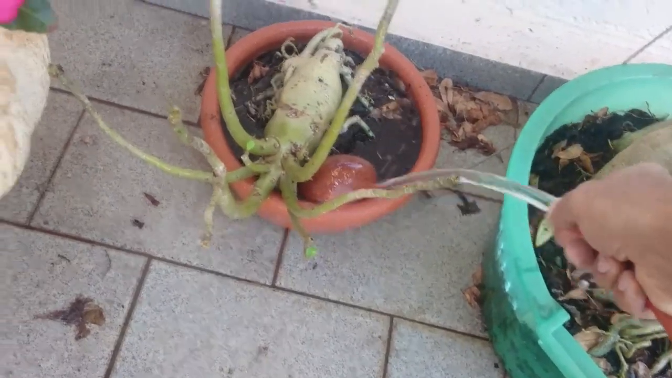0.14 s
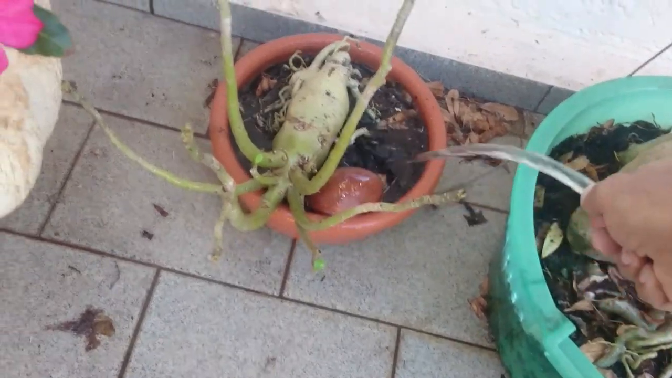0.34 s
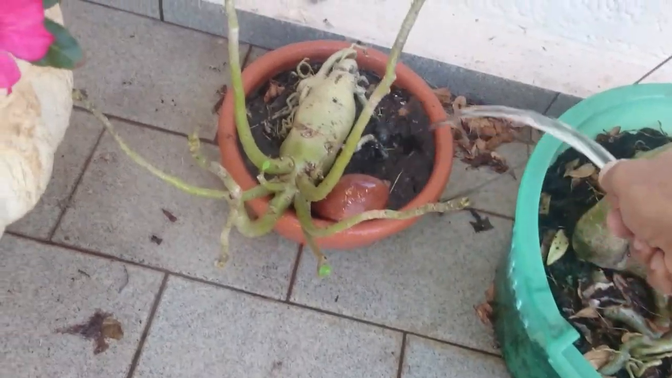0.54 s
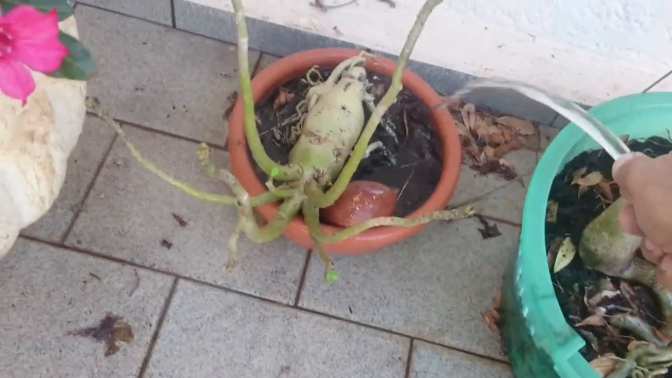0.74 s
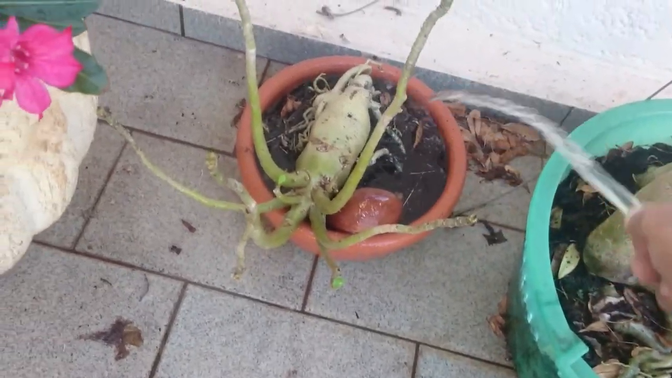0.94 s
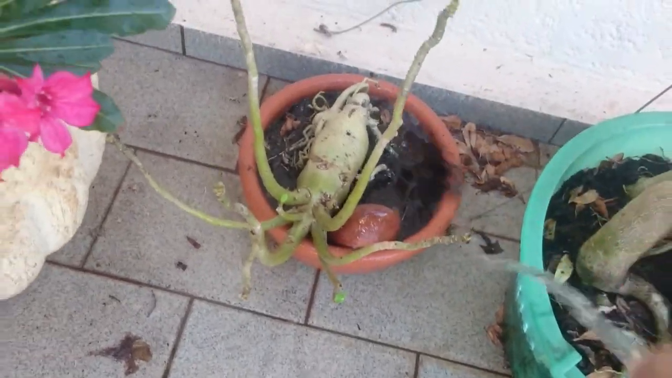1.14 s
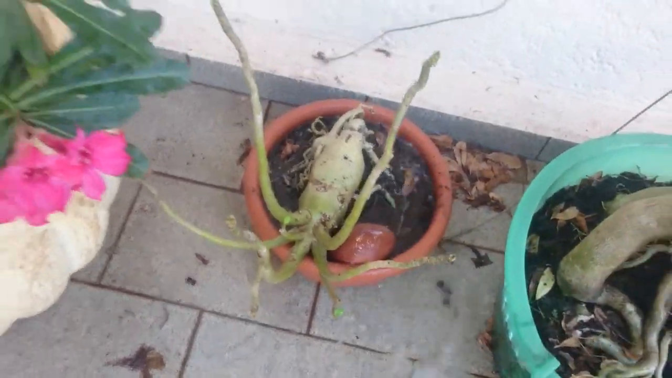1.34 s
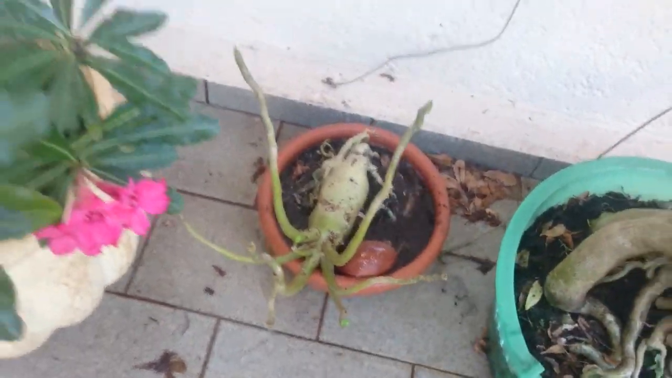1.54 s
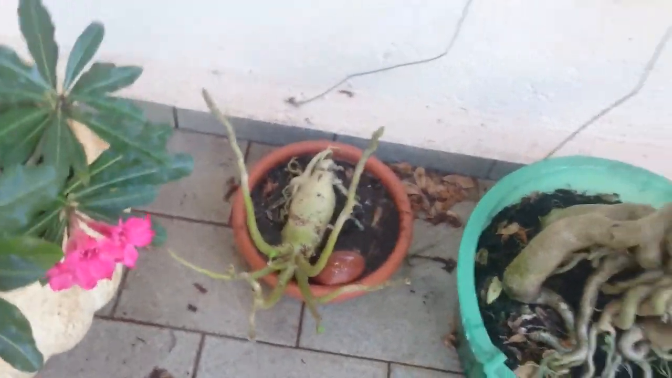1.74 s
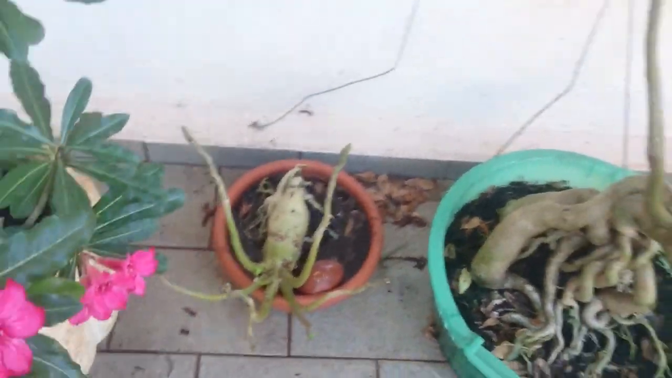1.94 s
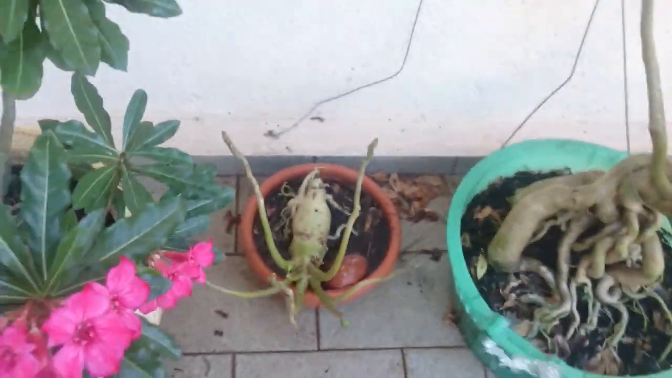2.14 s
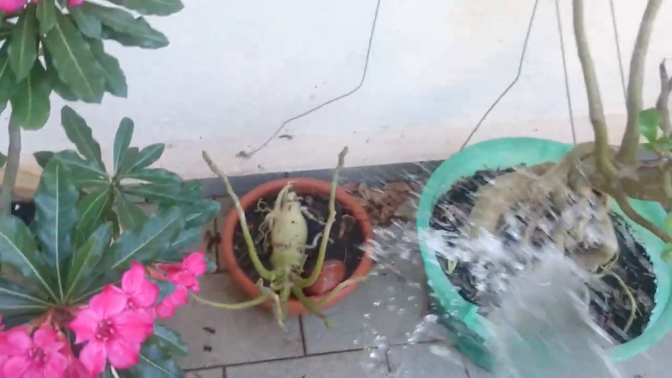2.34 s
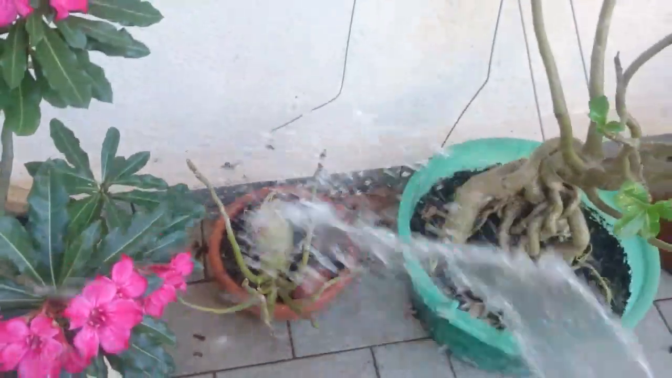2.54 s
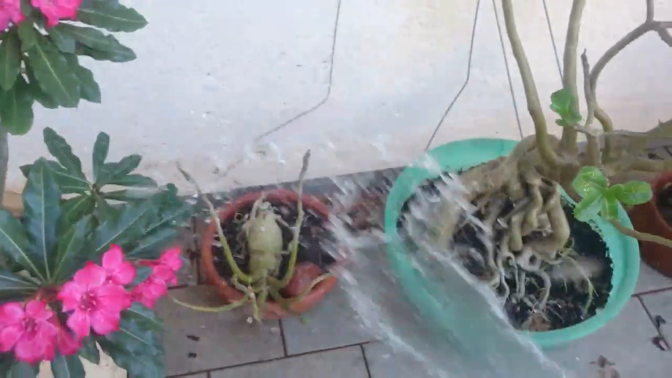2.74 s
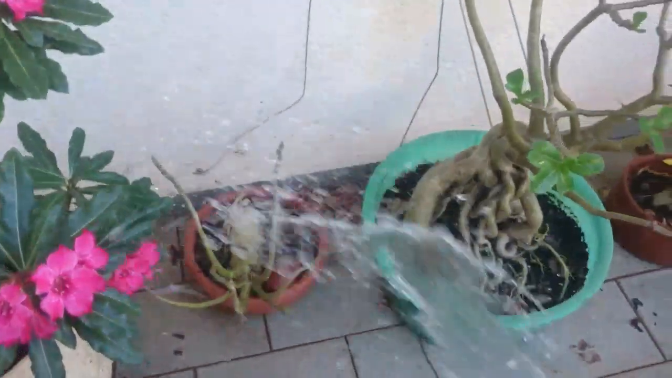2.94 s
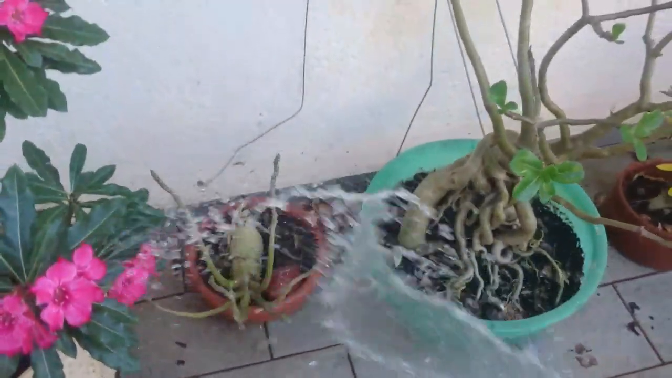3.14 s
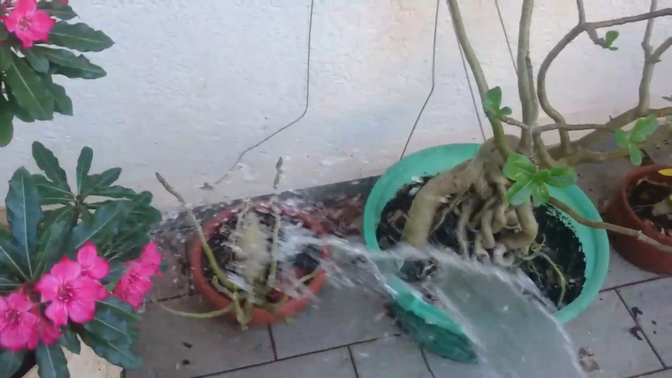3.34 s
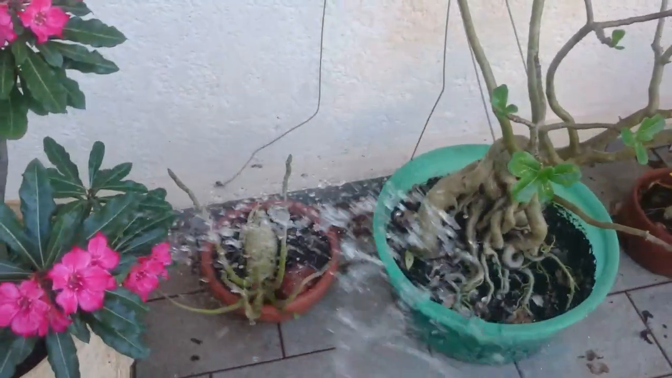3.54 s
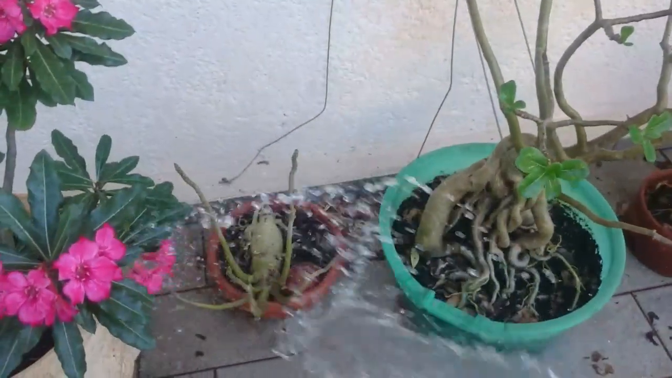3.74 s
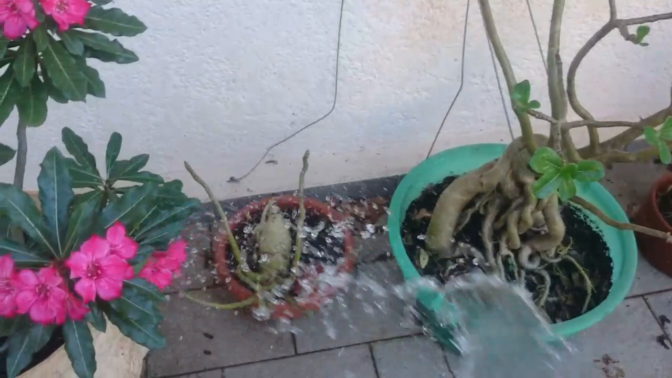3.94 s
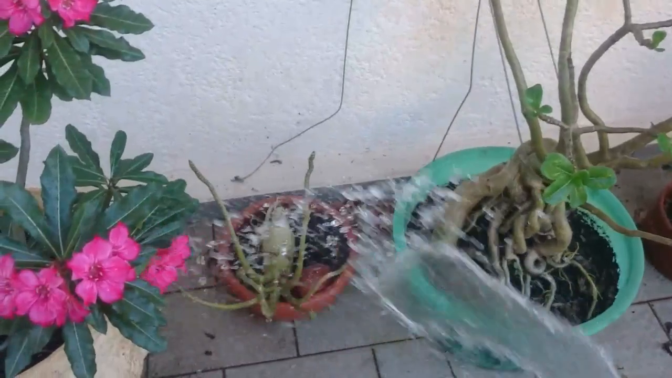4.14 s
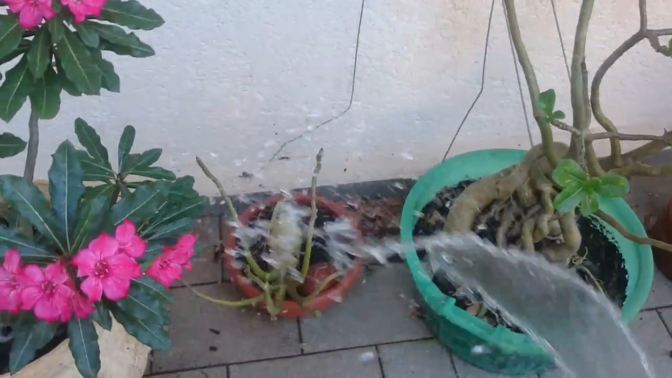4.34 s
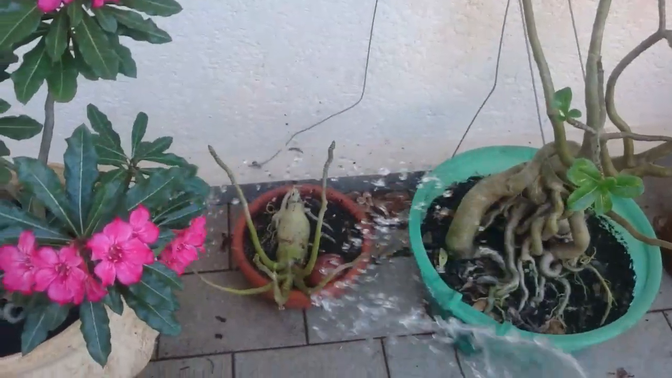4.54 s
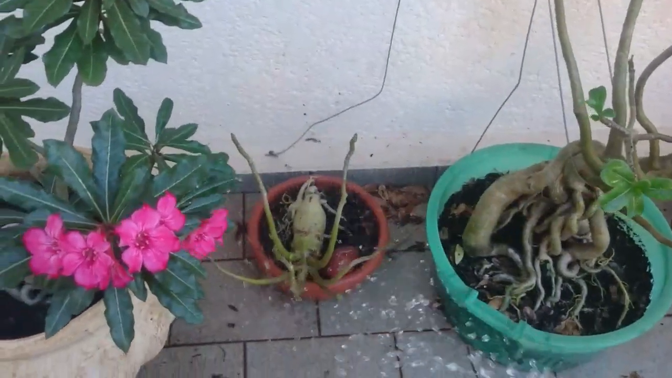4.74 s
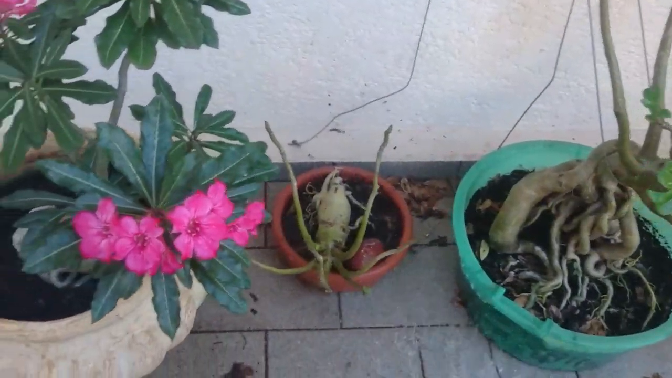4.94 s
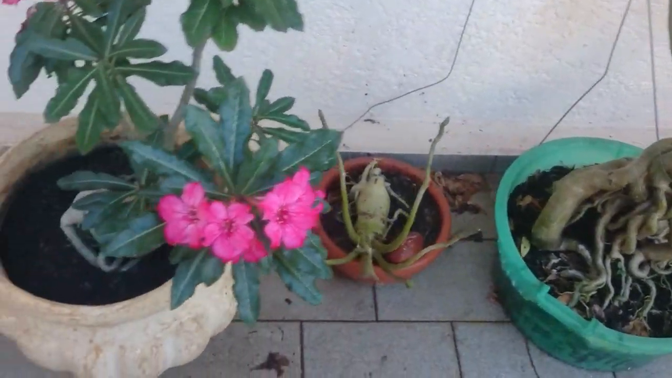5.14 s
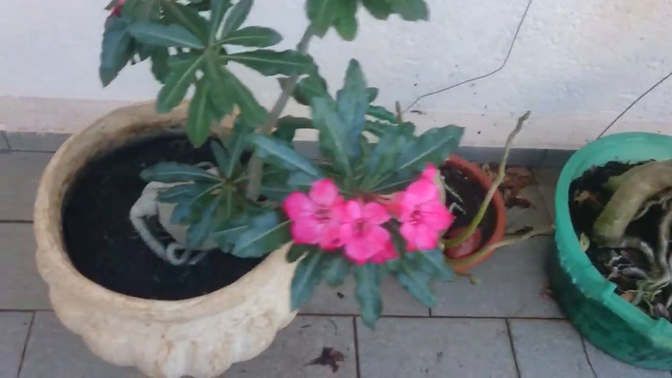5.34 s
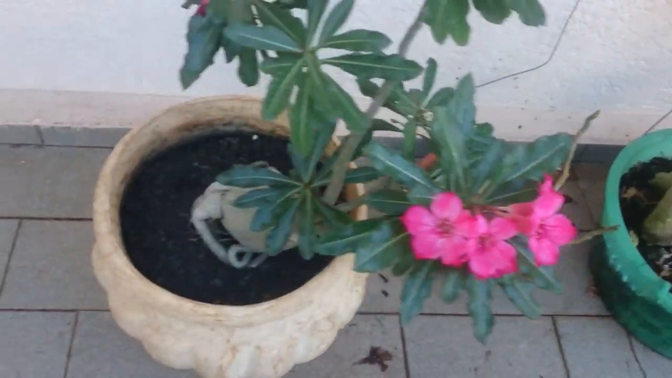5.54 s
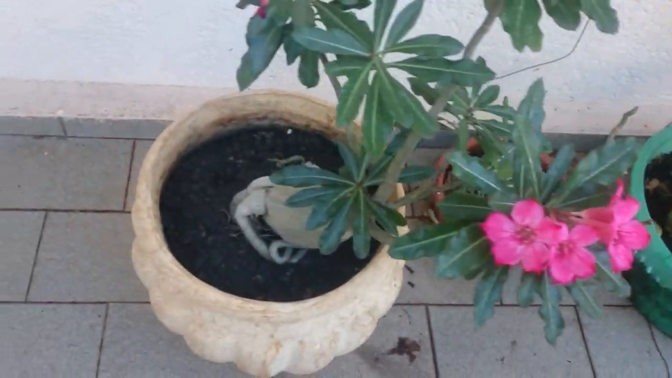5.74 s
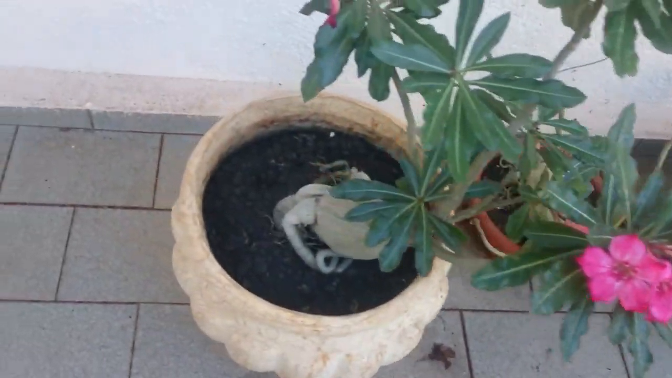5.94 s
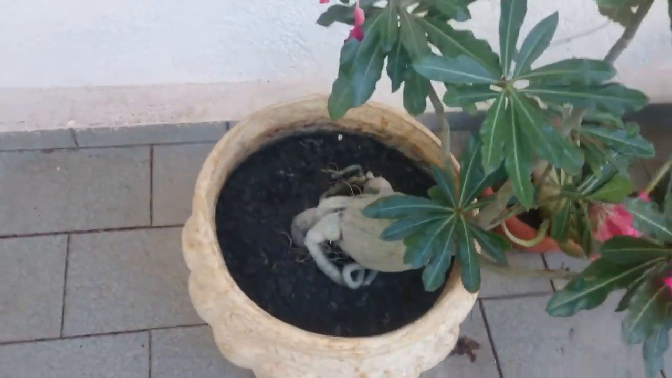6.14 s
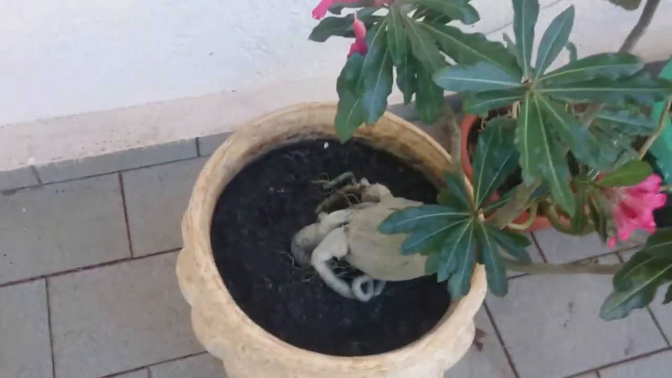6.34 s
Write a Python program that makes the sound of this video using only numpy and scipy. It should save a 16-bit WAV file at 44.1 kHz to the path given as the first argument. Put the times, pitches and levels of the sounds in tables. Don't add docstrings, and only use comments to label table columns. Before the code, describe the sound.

Water from a garden hose, heard near in stereo: quiet, steady pouring with small rising gurgles, a few sharp spatters, then dense irregular splashing with wet slaps and clicking droplets, leaning slightly left. It eases abruptly into a faint misty trickle with tiny ticks. Short hard reflections come from wall and tiles, a shoe scuffs dully once or twice, and low far traffic lies underneath.

```python
import sys
import numpy as np
from scipy import signal
from scipy.fft import rfft, irfft, next_fast_len
from scipy.io import wavfile
from scipy.ndimage import uniform_filter1d

SR = 44100
rng = np.random.default_rng(int(sys.argv[2]) if len(sys.argv) > 2 else 0)


def gain_from_decibels(decibels):
    exponent = np.asarray(decibels, float) / 20
    return 10 ** exponent


def wav_record(signal):
    frames = np.transpose(np.atleast_2d(signal))
    bounded = np.clip(frames, -1, 1)
    quanta = np.round(bounded * 32767).astype(np.int16)
    wavfile.write(sys.argv[1], SR, quanta)


N = 286650
TIME = np.arange(N) / SR


def evened(x):
    return x / np.sqrt(np.mean(x ** 2) + 1e-20)


def read(points, hz):
    f, value = np.transpose(points)
    return np.interp(np.log(hz + 1), np.log(f + 1), value)


def coloured(x, gain):
    size = next_fast_len(N + 4096)
    spectrum = rfft(x, size) * gain(np.fft.rfftfreq(size, 1 / SR))
    return irfft(spectrum, size)[..., :N]


def add(mix, start_s, sound):
    part = mix[..., max(round(start_s * SR), 0):][..., :sound.shape[-1]]
    part += sound[..., :part.shape[-1]]


# start_s, flow_db, thumb_fan_0_to_1, left_minus_right_db
HOSE_FLOW = [
    (0.0, -43, 0, 1.5),
    (1.18, -41.5, 0.35, 2),
    (1.751, -44.5, 0, 0),
    (2.41, -39.5, 0.4, 3),
    (2.7, -40, 0.6, 1),
    (4.56, -42.5, 0.85, 2),
    (4.82, -37.5, 0.94, 2.5),
    (5.25, -44, 0.42, 1.5),
    (5.96, -47.5, 0.8, 0.5),
    (6.5, -46, 0.24, 0.5),
]
# start_s, level_db, mist_share_db, length_s
SLUG_SLAPS = [(0.16, -33, -14, 0.083), (0.22, -39, 1, 0.044), (1.262, -34, 0, 0.02),
              (1.929, -32.5, 1.5, 0.04), (2.031, -35.5, 2, 0.075), (2.062, -33, -14.5, 0.077),
              (2.279, -33, 7, 0.04), (2.34, -41, 7, 0.032), (2.597, -33.5, 1, 0.03),
              (2.669, -34, -5, 0.024), (2.79, -30, -3, 0.022), (2.806, -26, -3.5, 0.032),
              (2.893, -37, 0, 0.29), (3.062, -32.5, 0, 0.049), (3.168, -25.5, -1, 0.031),
              (3.357, -36.5, 5, 0.038), (3.42, -22.5, -10, 0.048), (3.463, -28.5, -11, 0.057),
              (3.55, -33, -3, 0.04), (3.572, -27, -0.5, 0.043), (3.691, -28, -6.5, 0.029),
              (3.828, -27.5, -2.5, 0.039), (4.192, -32, -2, 0.044), (4.206, -31.5, -7, 0.029),
              (4.8, -33, -12, 0.027), (5.247, -40, 3.5, 0.05), (5.726, -40.5, 1.5, 0.025),
              (6.023, -41.5, -4, 0.054), (6.235, -42, 1, 0.06)]
# start_s, level_db, mist_share_db, length_s
LEAF_SHEETS = [(0.896, -31.5, -9, 0.065), (1.055, -32.5, -11, 0.09), (1.226, -23.5, -6.5, 0.021),
               (1.337, -28.5, -4.5, 0.014), (1.53, -35.5, -20, 0.033), (1.748, -36.5, -17, 0.04),
               (1.841, -35, -11, 0.058), (2.105, -32.5, -5, 0.1), (2.243, -29, -5.5, 0.11),
               (2.4, -31, 3.5, 0.05), (2.463, -28.5, -2, 0.031), (2.505, -30.5, -2, 0.055),
               (2.765, -30, -22, 0.038), (3.03, -30, -7, 0.04), (3.126, -33.5, -3, 0.12),
               (3.452, -34, 4, 0.035), (3.93, -30, -19, 0.023), (3.982, -33, -0.5, 0.057),
               (4.087, -32, 0.5, 0.046), (4.352, -35, 1, 0.093), (4.437, -34, -6, 0.039),
               (4.523, -29, -9, 0.07), (4.686, -28.5, -3, 0.054), (4.768, -36.5, 6, 0.032),
               (4.846, -33, 3.5, 0.06), (4.905, -28, -5.5, 0.11), (4.989, -29.5, -1, 0.051),
               (5.61, -40, 0.5, 0.066), (6.318, -39, -16, 0.02)]
# start_s, level_db, mist_share_db
RIM_DRIBBLES = [(0.574, -43, -12), (0.76, -41, 0), (1.45, -42, 0), (1.785, -44, 8), (2.553, -33.5, -4),
                (3.3, -33.5, -4), (4.239, -28.5, -4.5), (4.299, -34, -22), (5.05, -42, -2),
                (5.161, -38, 1.5), (5.366, -42, 0), (5.436, -41, -17), (5.9, -48, 6), (6.42, -51, 1),
                (6.08, -48.5, 6.5), (6.115, -51, 6), (6.35, -49, 8), (3.665, -36, 0), (3.85, -38, -5)]


def water_power():
    start_s, flow_db, fan, _ = np.transpose(HOSE_FLOW)
    large_db, mist_db = np.interp(fan, (0, 1), (-8.5, -10.5)), np.interp(fan, (0, 1), (-5, 0.7))
    shares_db = (large_db, -1.5, mist_db)
    steady = gain_from_decibels([np.interp(TIME, start_s, flow_db + share) for share in shares_db]) ** 2

    bursts, t = np.zeros((3, N)), np.arange(9000) / SR
    dribble_s = 0.044
    thin = LEAF_SHEETS + [(*row, dribble_s) for row in RIM_DRIBBLES]
    for rows, large_share_db in ((SLUG_SLAPS, -7), (thin, -13.5)):
        for s, level_db, mist_share_db, length_s in rows:
            attack = 1 - np.exp(-t / 0.00068)
            body = np.exp(-(t / (0.85 * length_s)) ** 2)
            click, tail = 0.51 * np.exp(-t / 0.0012), 0.023 * np.exp(-t / 0.049)
            size_db = level_db - 5.0 + np.array([[large_share_db], [0], [mist_share_db]])
            add(bursts, s - 0.001, gain_from_decibels(size_db) ** 2 * attack * (body + click + tail))

    landings = (rng.random(N) < 220 / SR) * rng.exponential(1, N)
    clumps = signal.lfilter([1], [1, -np.exp(-1 / (0.003 * SR))], landings)
    ragged = 1.9 + evened(clumps) ** 1.3
    slow = uniform_filter1d(rng.standard_normal((3, N)), size=900)
    surges_db = evened(uniform_filter1d(slow, size=900))
    uneven = gain_from_decibels(surges_db + 0.3 * surges_db[1]) ** 2 * np.sqrt(ragged)
    return steady * uneven / uneven.mean() + bursts * ragged / ragged.mean()


def plink(hz, cycles, glide, lag, phase, rise=0.36):
    u = np.maximum(np.arange(600) - lag, 0) / SR * hz / cycles
    swell = (u / rise) ** 2 * np.exp(2 - 2 * u / rise)
    return swell * np.sin(2 * np.pi * (cycles * u * (1 + glide * u) + phase))


# freq_hz, level_db_per_hz
SPLASH_COLOUR = [(410, -50), (700, -42), (1200, 3), (1710, -16.5), (2100, -15), (2560, -15), (3640, -2),
                 (4670, 0.5), (5840, -1), (7200, -9), (8210, -12.5), (9480, -6), (10400, -10.5),
                 (12300, -14), (16000, -29)]


def patter(low_hz, high_hz, per_s, cycles, hiss, spread_db=3.0, count=24):
    loudness = gain_from_decibels(spread_db * np.minimum(rng.exponential(1, N), 2.5))
    hits = loudness * (rng.random(N) < per_s / SR)
    kind, drops = rng.integers(0, count, N), np.zeros((2, N))
    for k, hz in enumerate(np.geomspace(low_hz, high_hz, count)):
        glide, lag, phase, long = rng.random(4)
        pair = np.array([side * plink(hz, cycles * (0.5 + long), 0.19 * glide, late, phase)
                         for side, late in ((1.0, 0.014), (-0.36, 60 * lag))])
        rain = signal.oaconvolve((hits * (kind == k))[None], pair, axes=1)[:, :N]
        drops += hz / low_hz * rain / np.sqrt(0.5 + long)
    noise = rng.standard_normal((2, N)) * np.sqrt(SR / 2 / (high_hz - low_hz))
    mixed = np.sqrt(1 - hiss) * evened(drops) + np.sqrt(hiss) * noise

    def band(hz):
        edges = (1 + (low_hz / (hz + 1)) ** 16) * (1 + (hz / high_hz) ** 16)
        return gain_from_decibels(read(SPLASH_COLOUR, hz)) / np.sqrt(edges)

    return evened(coloured(mixed, band))


def clumped(x):
    z = signal.stft(x, nperseg=256)[2]
    rough = uniform_filter1d(rng.standard_normal(z.shape[1:]), size=4, axis=0)
    patches = evened(uniform_filter1d(rough, size=12, axis=1))
    depth_db = np.linspace(1.7, 0.35, len(patches))[:, None]
    lift = gain_from_decibels(depth_db * patches)
    lift /= np.sqrt(np.mean(lift ** 2, axis=1, keepdims=True))
    return signal.istft(z * lift, nperseg=256)[1][:, :N]


# low_hz, high_hz, drops_per_s, ring_cycles, hiss_share
DROP_SIZES = [
    (1802, 3080, 900, 11.6, 0.64),
    (3090, 6570, 2500, 8.5, 0.59),
    (6960, 15700, 4700, 9, 0.51),
]


def spray():
    start_s, *_, pan_db = np.transpose(HOSE_FLOW)
    pan = gain_from_decibels(np.interp(TIME, start_s, pan_db - 0.6) * [[0.5], [-0.5]])
    rain = sum(np.sqrt(power) * patter(*size) for power, size in zip(water_power(), DROP_SIZES))
    return pan * clumped(rain)


# start_s, peak_db, pitch_hz, left_minus_right_db
BIG_DROPS = [(0.2086, -19, 2460, 6), (1.3412, -20.5, 4100, 9), (2.062, -22.5, 5260, 17),
             (2.28, -16, 4970, 17), (2.2915, -16.5, 5560, 18), (2.303, -17, 4700, 11),
             (2.341, -21, 4300, 14), (2.4012, -15.5, 4870, 13), (2.4598, -21, 4600, 14),
             (2.4729, -14.5, 4500, 11), (2.6019, -21, 5060, 11), (2.7568, -18.5, 4440, 9),
             (2.807, -13.5, 4100, -1), (2.8216, -22, 4000, -7), (3.0647, -20.5, 3600, -3),
             (3.1722, -25, 4600, -8), (3.4204, -14.5, 3800, -2), (3.4278, -20, 3480, 5),
             (3.433, -17, 3950, 7), (3.4834, -14.5, 3650, 0), (3.8288, -19, 2220, 5),
             (3.9314, -20.5, 5050, 3), (4.5218, -15, 4600, -1), (4.6896, -21, 3500, 16),
             (4.8067, -17, 3540, 6), (4.8483, -21.5, 4700, 17), (4.9067, -17, 4900, 19),
             (4.986, -19, 5070, 17), (5.0092, -18, 4250, 11)]
# start_s, peak_db, pitch_hz
HOSE_DRIPS = [(0.05, -32, 5100), (0.23, -27.0, 3600), (0.45, -36, 3960), (0.5844, -22, 4730),
              (0.54, -32, 3200), (0.754, -30, 3220), (1.227, -22, 5600), (1.253, -22, 4760),
              (1.2, -21, 5380), (1.5383, -26.5, 4260), (2.255, -24, 4960), (2.3654, -23, 5100),
              (2.2, -26, 5460), (3.0745, -20, 3800), (3.1264, -22, 4770), (3.4203, -25, 2040),
              (3.456, -20, 4000), (3.4626, -16.5, 4860), (3.587, -19, 5100), (3.7, -19, 4800),
              (4.6885, -26, 4600), (2.6, -20, 5900), (0.19, -21, 3900), (3.8295, -26, 2900),
              (3.2, -19.5, 3300), (4.2098, -21.5, 2870), (4.24, -19.5, 5300), (4.816, -17.5, 4400),
              (4.916, -25, 4100), (4.9335, -17, 5300), (4.949, -18, 4600), (5.4384, -28.5, 5900),
              (5.8, -31, 3850), (6.028, -32, 5600), (5.6, -34, 5700), (5.945, -35, 5300),
              (5.565, -29.5, 5000), (0.57, -27, 4050), (4.699, -28, 3100), (3.47, -27, 5000),
              (3.1, -16, 5700), (2, -19.5, 7200), (1.339, -20, 6400), (2.4167, -22.5, 3660)]
# start_s, peak_db
PORT_PINGS = [(1.938, -24), (1.941, -25), (2.026, -23), (2.383, -23), (2.4166, -30), (2.426, -21),
              (2.4528, -24), (2.8945, -25), (3.1758, -24), (3.1804, -21), (3.3487, -21.5), (3.37, -30),
              (4.27, -27), (4.433, -23), (4.769, -19.5), (4.885, -21), (5.531, -27.5)]
# start_s, peak_db, pitch_hz, left_minus_right_db
SLUG_SPATTER = [(0.059, -32, 5070, -12), (0.321, -27, 4470, 8), (0.7802, -30, 3880, 11),
                (0.8966, -38, 4240, -6), (0.906, -33, 4460, -7), (0.923, -32, 4540, -5),
                (1.2081, -36, 4570, -13), (1.2661, -23, 4600, 14), (1.642, -31.5, 5570, 17),
                (2.0265, -31, 5990, 12), (2.1068, -29, 5320, 11), (2.1483, -26, 5170, 14),
                (2.5251, -33, 5140, 5), (2.5563, -24.5, 5190, 12), (2.5867, -25, 3960, 10),
                (2.772, -26, 4270, 0), (2.7967, -25, 5960, 5), (2.9455, -29, 4390, 6),
                (2.9797, -25.5, 5620, -3), (2.9928, -31, 5790, -2), (3.175, -19, 4370, -1),
                (3.1783, -24, 4670, 2), (3.3643, -25, 6270, 7), (3.5556, -25, 4780, 2),
                (3.611, -26, 4740, -1), (3.823, -33, 5380, 17), (3.83, -24, 3550, 6),
                (3.9991, -25, 4500, 14), (4.1318, -27, 4800, 7), (4.2127, -26, 5700, 11),
                (4.2566, -27, 5230, 14), (4.3159, -29, 4310, 1), (4.73, -27, 5170, 9),
                (4.782, -30, 4800, 2), (4.8813, -22.5, 5120, 11), (4.911, -24, 5230, 8),
                (4.918, -23, 4800, 9), (4.967, -26, 4340, 8), (5.006, -21, 4860, 14),
                (5.0164, -27, 4050, -3), (5.1486, -35, 5500, 9), (5.185, -31, 3850, 5),
                (5.2668, -30, 5150, 8), (5.7354, -34, 6420, 11), (6.3282, -30.5, 5100, -2)]
# start_s, peak_db, pitch_hz
FINE_SPARKS = [(1.0048, -32, 9150), (2.039, -31, 9600), (2.1276, -32, 9970), (2.162, -35, 9560),
               (2.2799, -22, 9630), (2.3128, -25, 9350), (2.342, -30, 9170), (2.4604, -31, 9040),
               (2.5883, -24, 11000), (2.5979, -23, 9860), (2.695, -33, 9370), (2.979, -36, 8050),
               (3.093, -31, 9300), (3.1266, -30, 10700), (3.3663, -30, 9300), (3.4323, -28, 9300),
               (3.4722, -29, 9000), (3.4808, -33, 9520), (3.7044, -29, 9650), (3.8199, -31, 9390),
               (4.0868, -29, 9700), (4.2059, -31, 8800), (4.2779, -29.5, 9260), (4.3647, -33, 9520),
               (4.5163, -34, 9800), (4.6957, -31, 9730), (4.7877, -28, 8980), (4.8003, -29, 9560),
               (4.8484, -30, 9670), (4.9357, -28, 9500), (4.949, -28, 9800), (5.008, -25, 9350),
               (5.5167, -35, 9930),
               (5.7299, -39, 9710), (5.902, -40, 9700), (6.0193, -40, 9240), (6.2386, -39, 9350),
               (6.269, -34.5, 9330), (6.4278, -39, 9120)]
# start_s, peak_db, pitch_hz
SOIL_BUBBLES = [(0.0999, -43, 1990), (0.1547, -45, 1170), (0.1767, -30.5, 2700), (0.1988, -31, 2500),
                (0.22, -30, 2460), (0.2239, -38, 2610), (0.2829, -36, 2600), (0.2877, -39, 2540),
                (0.3726, -44, 2450), (0.4697, -42, 1960), (0.5604, -41, 2540), (0.7578, -38, 2580),
                (0.7684, -39, 2100), (0.789, -42, 2270), (0.8226, -38, 2450), (0.8535, -38, 2390),
                (1.0313, -38, 2450), (1.0994, -36, 2240), (1.1169, -44, 2060), (1.1316, -36, 2060),
                (1.1541, -37, 2530)]
# start_s, peak_db, pitch_hz
PUDDLE_PLOPS = [(1.2801, -43, 2670), (2.0516, -41, 2280), (2.0759, -41, 2020), (2.2793, -39, 2730),
                (2.3147, -36, 2270), (2.3409, -35.5, 2350), (2.4699, -40, 2990), (2.6736, -44, 1840),
                (2.7722, -39, 2990), (2.8071, -33, 2990), (2.8234, -30, 2860), (2.9444, -36.5, 2950),
                (3.0644, -34, 2990), (3.1693, -30, 2900), (3.3609, -43, 2990), (3.4542, -36, 2320),
                (3.6917, -36, 2090), (4.1005, -41, 2950), (4.2262, -33, 3050), (4.2582, -41, 2630),
                (4.2998, -34, 2890), (4.6962, -33, 2890), (4.8843, -41, 2410), (4.9071, -34, 2860),
                (4.9521, -34, 2930)]


def all_drops():
    start_s, *_, pan_db = np.transpose(HOSE_FLOW)
    ping_hz, ping_pan_db = 9230, 12.5
    swing = 4.5
    rows = BIG_DROPS + [(s, db, hz, swing * np.interp(s, start_s, pan_db)) for s, db, hz in HOSE_DRIPS]
    rows += [(s, db, ping_hz, ping_pan_db) for s, db in PORT_PINGS]
    rows += [(s, db + 1, hz, side_db) for s, db, hz, side_db in SLUG_SPATTER]
    rows += [(s, db + 3.5, hz, ping_pan_db) for s, db, hz in FINE_SPARKS]
    rows += [(s, db + 6, hz, 1.5) for s, db, hz in SOIL_BUBBLES + PUDDLE_PLOPS]
    return rows


def big_drops():
    rings, spits, t = np.zeros((2, N)), np.zeros((2, N)), np.arange(600) / SR
    spit_shape = 0.9 * np.exp(-t / 0.0011) + 0.5 * np.exp(-(t / 0.0027) ** 2) + 0.31 * np.exp(-t / 0.0044)
    spit_hz = 3500.0
    for (s, peak_db, hz, pan_db), (lag, phase) in zip(all_drops(), rng.random((400, 2))):
        level = gain_from_decibels(peak_db + pan_db * np.array([[0.5], [-0.5]]))
        cycles = 3.14 + hz / 1390.0
        late = (np.round((8 + 40 * lag) * hz / SR) + 1 / 3) * SR / hz
        left = plink(hz, cycles, 0.018, 0, phase, 0.37)
        right = -plink(hz, cycles, 0.0035, late, phase, 0.4)
        add(rings, s - 0.25 * cycles / hz - 0.0003, level * np.array([left, right]))
        spit = rng.standard_normal((2, 600)) * spit_shape
        add(spits, s - 0.0008, level * min(hz / spit_hz, 1) ** 2 * spit)
    spits = coloured(spits, lambda hz: gain_from_decibels(read(SPLASH_COLOUR, hz)) / (1 + (2500.0 / (hz + 1)) ** 8))
    return gain_from_decibels(-0.5) * rings + gain_from_decibels(-6.5) * spits


def resonate(x, hz, width_hz):
    turn = np.exp(2j * np.pi * np.cumsum(hz) / SR)
    r = np.exp(-np.pi * width_hz / SR)
    return (turn * signal.lfilter([1 - r], [1, -r], x / turn)).real


# start_s, length_s, from_hz, to_hz, level_db
DEEP_POCKETS = [(0.15, 0.04, 1150, 1400, -46), (0.187, 0.044, 2350, 2630, -42),
                (0.245, 0.086, 2590, 3200, -44), (0.432, 0.058, 2020, 1940, -52),
                (0.633, 0.06, 1900, 1970, -45), (0.742, 0.15, 2520, 2500, -42),
                (0.758, 0.065, 2060, 1950, -42), (0.84, 0.041, 1950, 1930, -48),
                (1.01, 0.09, 2450, 2500, -39.5), (1.074, 0.041, 1930, 2050, -41),
                (1.09, 0.048, 1300, 1500, -46), (1.125, 0.034, 1850, 2100, -41),
                (1.128, 0.033, 2300, 2590, -39)]
# start_s, length_s, from_hz, to_hz, level_db
SHALLOW_POCKETS = [
    (.25, 0.15, 3660, 4700, -39.5),
    (.45, 0.2, 4100, 4680, -37.5),
    (.69, 0.14, 3940, 3940, -40),
    (.83, 0.11, 3960, 4560, -41),
    (.98, 0.14, 4230, 4370, -36),
]


def gurgle():
    out = np.zeros(N)
    for rows, width_hz, scatter in ((DEEP_POCKETS, 360.0, 0.03), (SHALLOW_POCKETS, 520.0, 0.03)):
        pops = (rng.random(N) < 500.0 / SR) * rng.standard_normal(N)
        drive = evened(pops) + 0.56 * rng.standard_normal(N)
        sizes = np.repeat(rng.standard_normal(N // 300 + 1), 300)[:N]
        for s, length_s, from_hz, to_hz, level_db in rows:
            u = np.linspace(-0.3, 1.3, round(1.6 * length_s * SR))
            at = round((s - 0.3 * length_s) * SR)
            span = slice(at, at + len(u))
            hz = np.interp(u, (0, 1), (from_hz, to_hz)) * np.exp(scatter * sizes[span])
            ring = evened(resonate(resonate(drive[span], hz, width_hz), hz, width_hz))
            add(out, at / SR, ring * gain_from_decibels(level_db - 7 * (2 * u - 1) ** 2))
    echo = np.roll(out, 33)
    return np.array([out, -0.5 * out - 0.53 * echo])


# freq_hz, t60_s
WALL_DECAY = [(1000, 0.28), (4000, 0.054), (12000, 0.059)]


def wall(x):
    out = np.zeros((2, N))
    for k in range(3):
        taps = np.zeros((2, 12000))
        at = np.arange(100, 11980, 20) + rng.integers(0, 20, (2, 594))
        np.put_along_axis(taps, at, rng.choice([-1., 1.], at.shape), 1)
        hz, t, z = signal.stft(taps, SR, nperseg=256)
        decay = gain_from_decibels(-60 * t / read(WALL_DECAY, hz)[:, None])
        tail = signal.istft(z * decay, SR, nperseg=256)[1]
        turn = np.sqrt(2 / 3) * np.cos(2 * np.pi * (1.7 * TIME + k / 3))
        out += signal.oaconvolve(x * turn, tail / np.linalg.norm(tail[0]), axes=1)[:, :N]
    return out


# start_s, level_db, pitch_hz
FOOT_SCUFFS = [
    (2.045, -43, 436),
    (2.149, -50, 373),
]


def scuffs():
    out, shape = np.zeros(N), np.hanning(1800)
    for s, level_db, hz in FOOT_SCUFFS:
        rub = evened(resonate(rng.standard_normal(1800), np.full(1800, hz), 160.))
        add(out, s - 0.02, gain_from_decibels(level_db) * shape * rub)
    return np.array([out, -0.85 * out])


# start_s, level_db, hold_s
AIR_GUSTS = [
    (0.307, -48, 0.066),
    (0.625, -51, 0.057),
    (1.85, -55, 0.13),
    (2.215, -38, 0.02),
    (2.27, -43, 0.1),
    (3.815, -47, 0.01),
    (3.895, -50, 0.01),
    (4.98, -55, 0.056),
    (5.988, -53, 0.15),
    (6.44, -47, 0.1),
]


def gust():
    a, b = rng.standard_normal((2, N))
    air = coloured(np.array([a + 0.19 * b, a - 0.23 * b]),
                   lambda hz: hz ** 3 / (1 + (hz / 39.0) ** 4.9) / (1 + (hz / 180.0) ** 6))
    rise_db_per_s, fall_db_per_s, calm_db = 800, 200, -72
    blow_db = [level_db - rise_db_per_s * np.maximum(s - TIME, 0)
               - fall_db_per_s * np.maximum(TIME - s - hold_s, 0) for s, level_db, hold_s in AIR_GUSTS]
    return evened(air) * gain_from_decibels(np.maximum(np.max(blow_db, axis=0), calm_db) - 10.0)


# freq_hz, level_db_per_hz
TOWN_COLOUR = [(18, -40), (30, 1), (99, 3), (140, -6.5), (255, -8), (291, -9.5), (1060, -6.5),
               (1680, -10.5), (1930, -8.5), (3000, -27), (3900, -77), (6600, -120)]
# start_s, level_db, drone_share_db
TRAFFIC_LEVEL = [(0, -58, 3.5), (.9, -57, -4), (1.7, -60, 2.5), (2.1, -57, 2.5), (2.6, -57, -1),
                 (3.4, -55.5, -1.5), (4.5, -53.5, 1.5), (4.95, -55.5, -2.5), (5.9, -55, 3.5),
                 (6.5, -59.5, 3.5)]
# freq_hz, left_right_likeness
PORT_LIKENESS = [(60, -1.07), (180, -0.88), (550, -0.63), (1650, 0.42), (4970, -1.5), (15000, 0.0)]


def town():
    a, b = rng.standard_normal((2, N))
    start_s, level_db, drone_db = np.transpose(TRAFFIC_LEVEL)

    def same(hz):
        return np.clip(read(PORT_LIKENESS, hz), -1, 1)

    right = coloured(a, same) + coloured(b, lambda hz: np.sqrt(1 - same(hz) ** 2))
    hum = evened(coloured(np.array([a, right]), lambda hz: gain_from_decibels(read(TOWN_COLOUR, hz))))
    drone = coloured(hum, lambda hz: 1 / (1 + (130. / (hz + 1)) ** 4) / (1 + (hz / 480.) ** 4))
    drone_gain = gain_from_decibels(np.interp(TIME, start_s, drone_db)) - 1
    return (hum + drone * drone_gain) * gain_from_decibels(np.interp(TIME, start_s, level_db) + 5.5)


def scene():
    water = spray() + big_drops() + gurgle()
    return water + gain_from_decibels(-8.5) * wall(water) + town() + scuffs() + gust()


def top_cut(x):
    return signal.sosfilt(signal.butter(12, 15900, fs=SR, output="sos"), x)


# freq_hz, left_minus_right_db
PORT_COLOUR = [(60, -5.5), (110, -1.5), (200, -5), (380, -2), (700, -5), (1290, -2), (2380, -1),
               (4400, -5.5), (8120, 5), (15000, -23.5)]


def record(dry):
    def port_gain(hz):
        sides = gain_from_decibels(read(PORT_COLOUR, hz) * [[0.5], [-0.5]])
        return sides * (hz < 15900) / (1 + (54.0 / (hz + 1)) ** 4)

    return top_cut(coloured(dry, port_gain))


dry = scene()
out = record(dry)
wav_record(out)
```